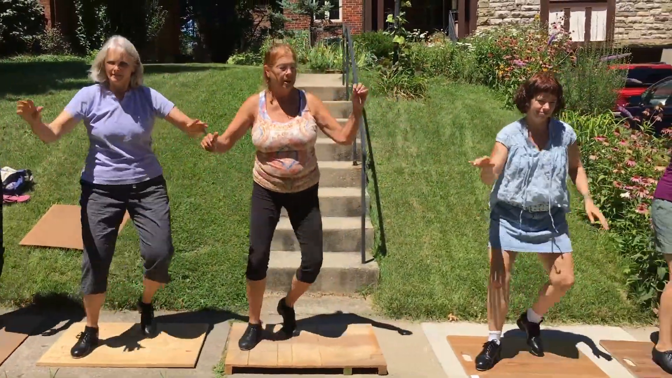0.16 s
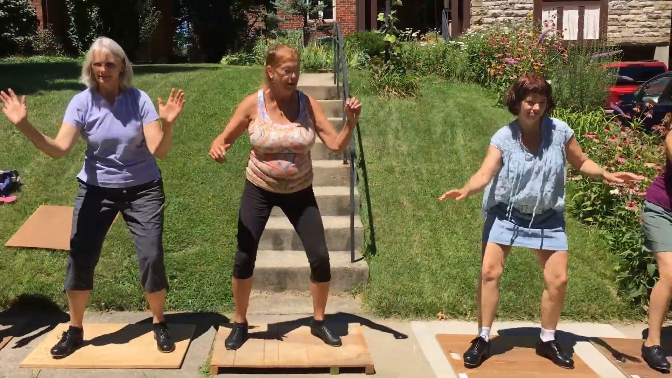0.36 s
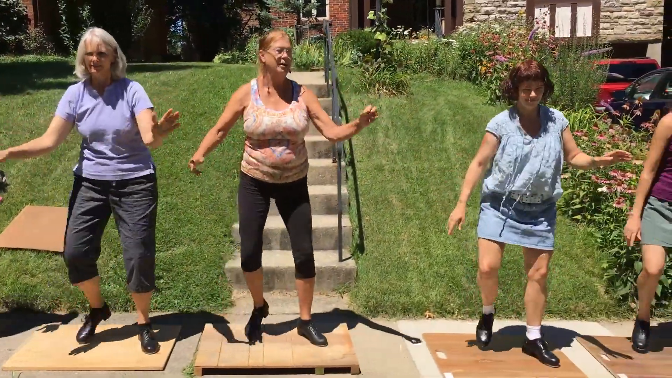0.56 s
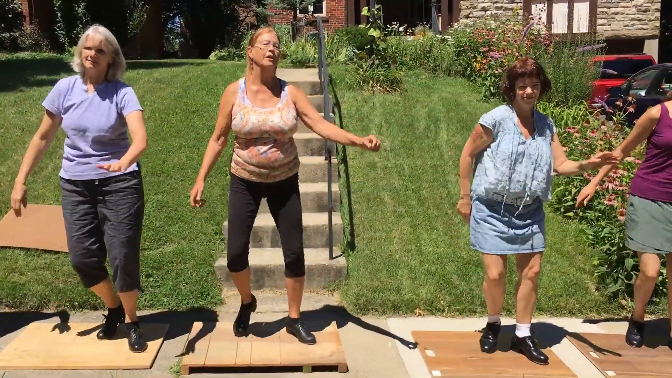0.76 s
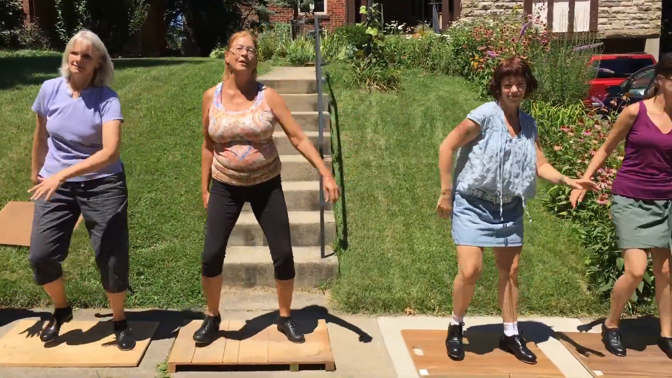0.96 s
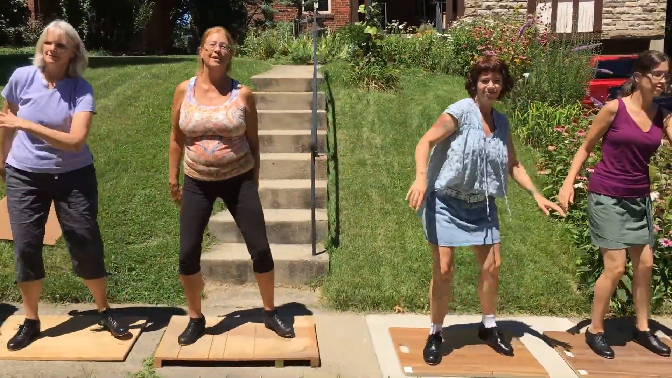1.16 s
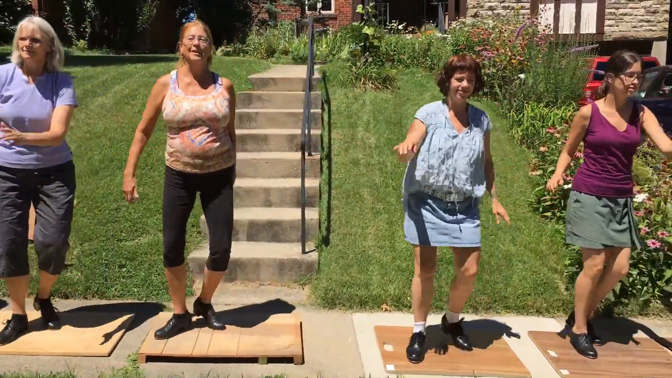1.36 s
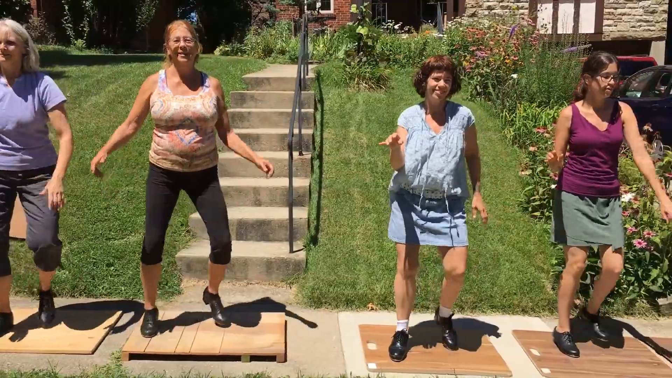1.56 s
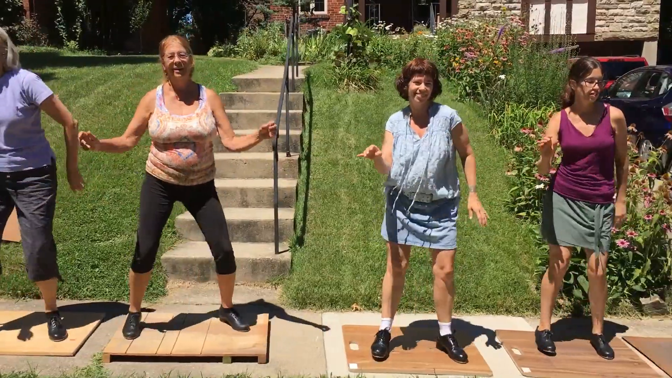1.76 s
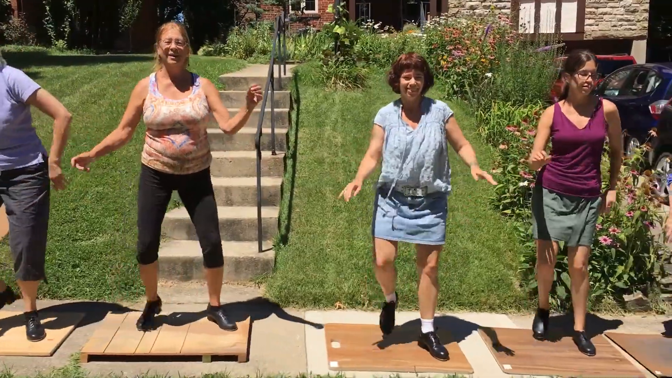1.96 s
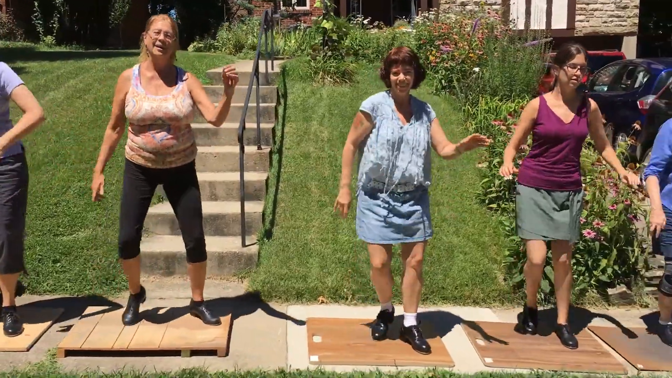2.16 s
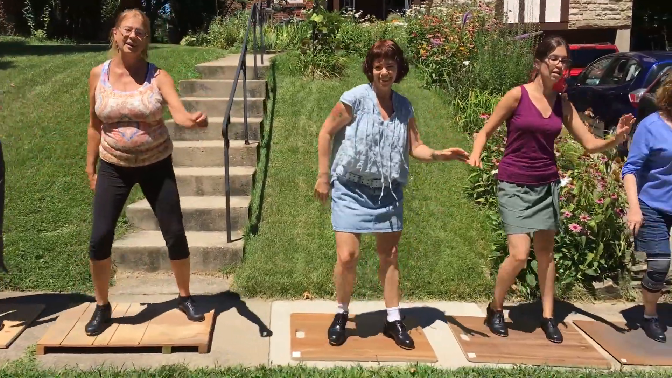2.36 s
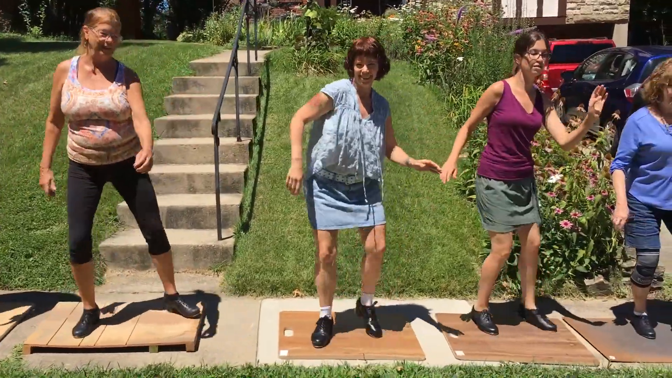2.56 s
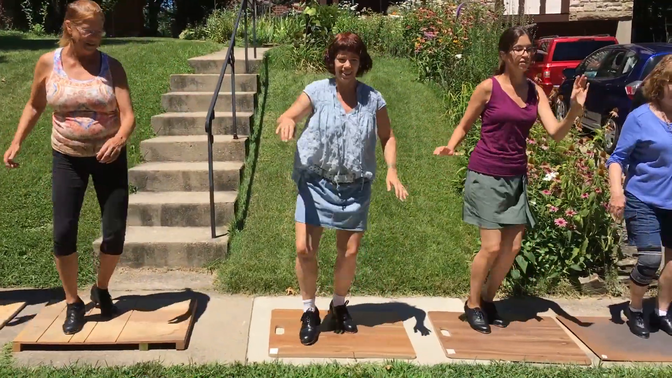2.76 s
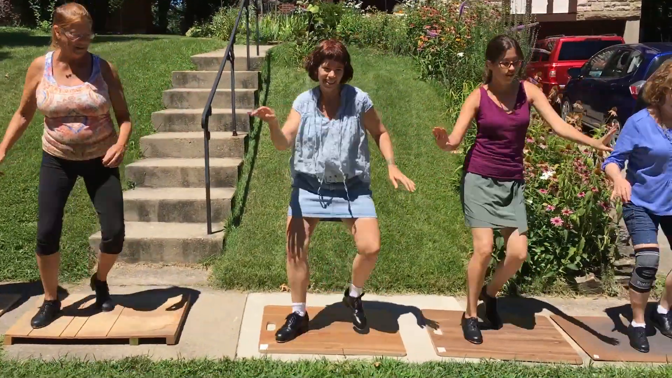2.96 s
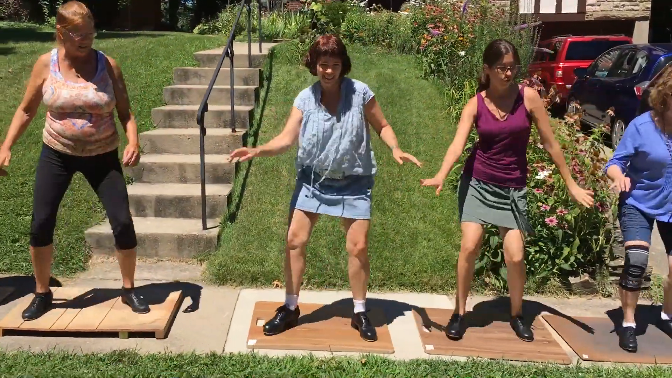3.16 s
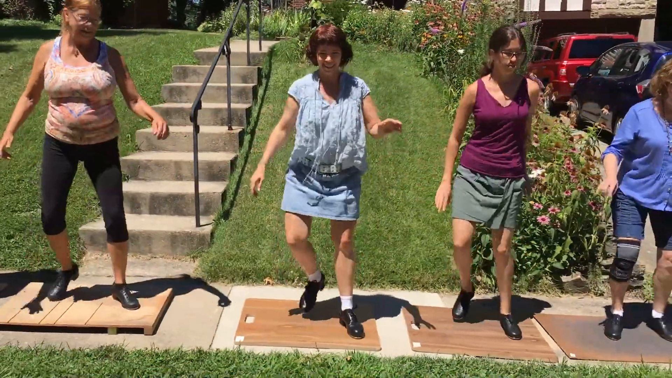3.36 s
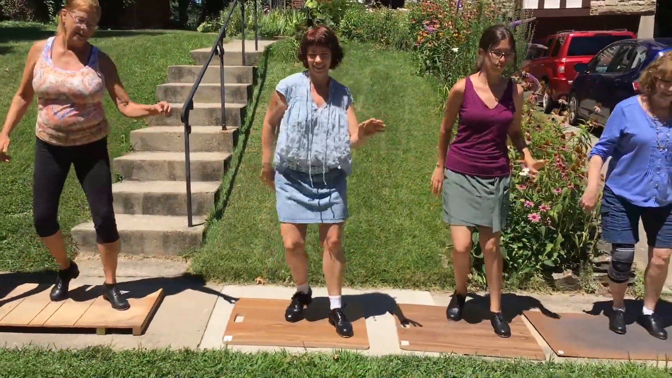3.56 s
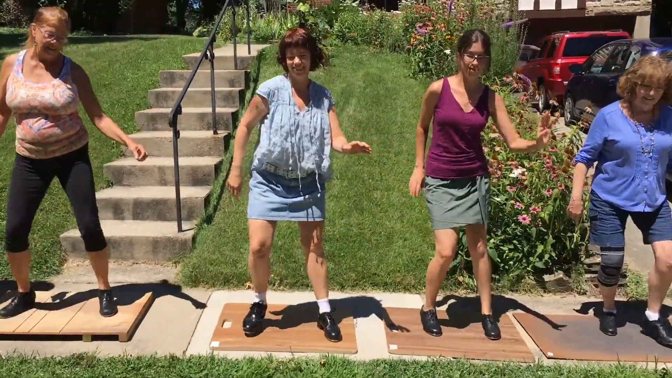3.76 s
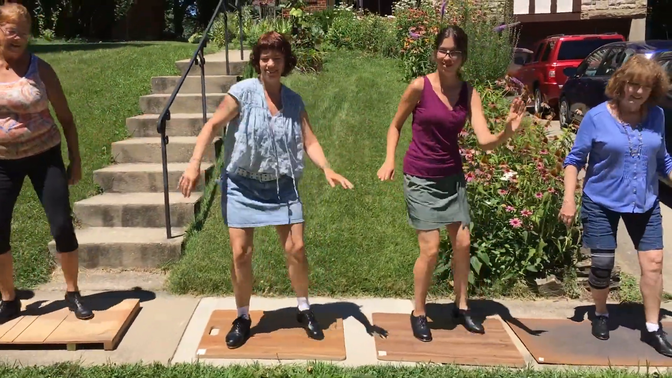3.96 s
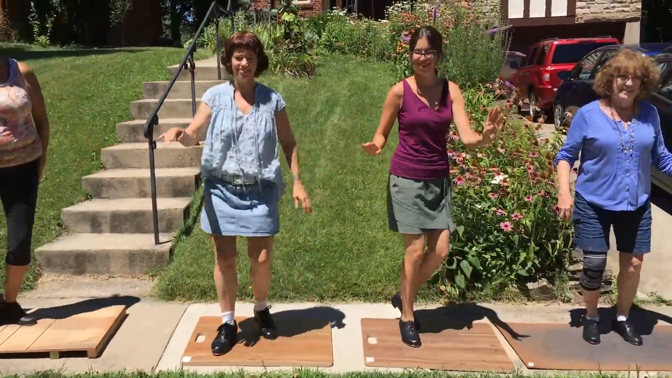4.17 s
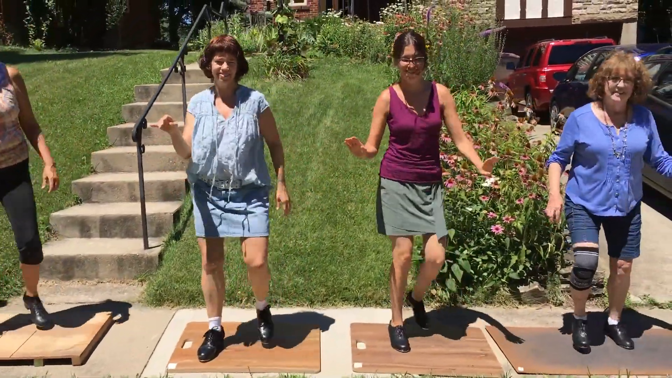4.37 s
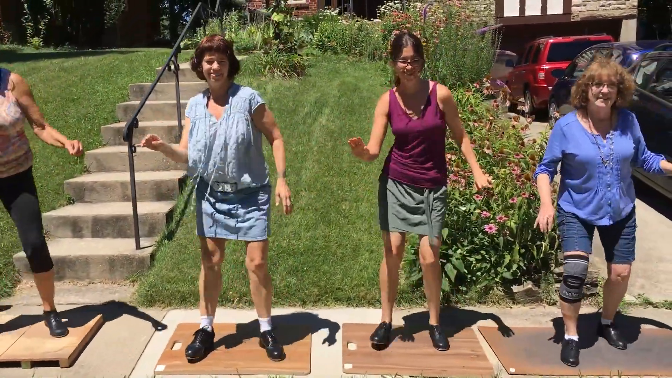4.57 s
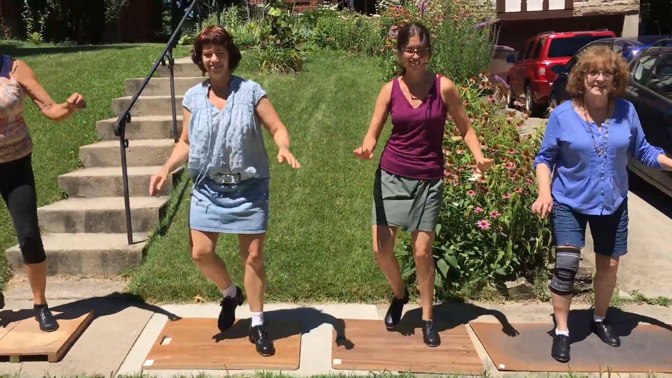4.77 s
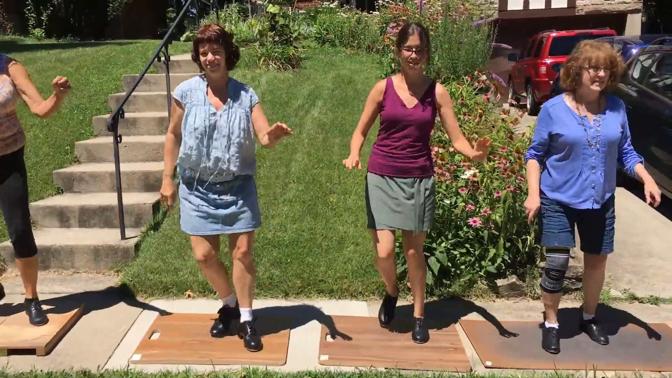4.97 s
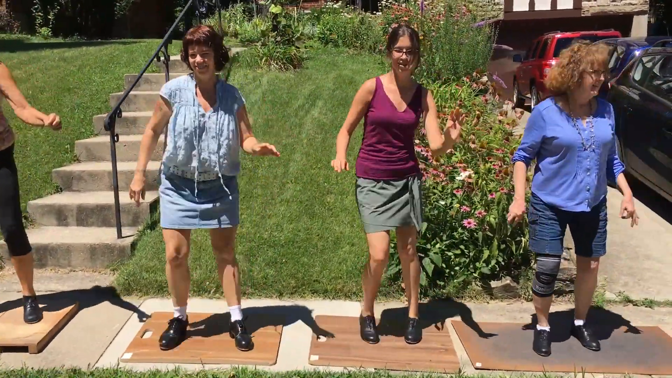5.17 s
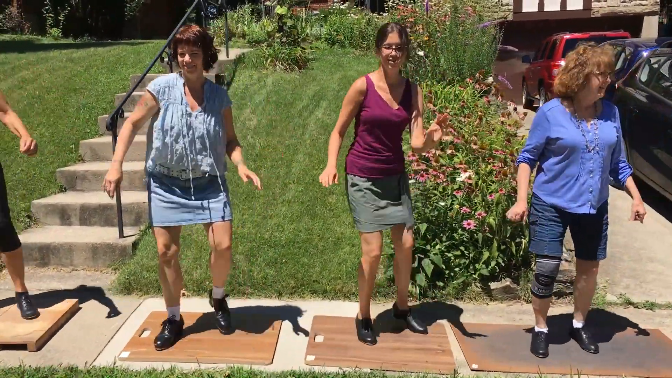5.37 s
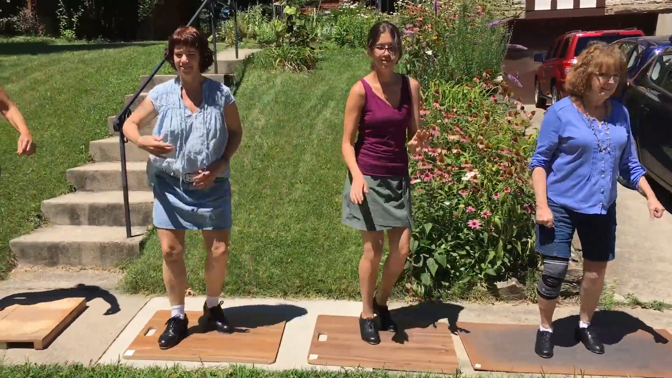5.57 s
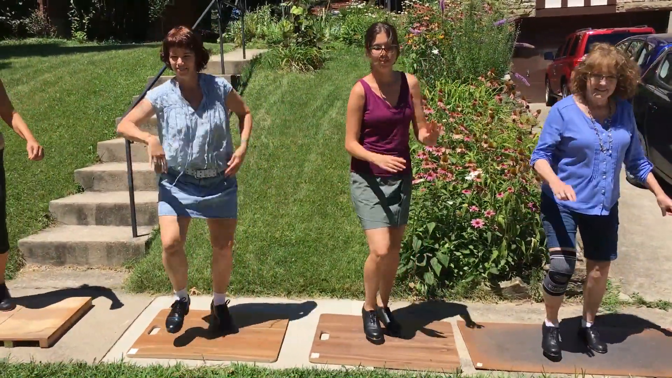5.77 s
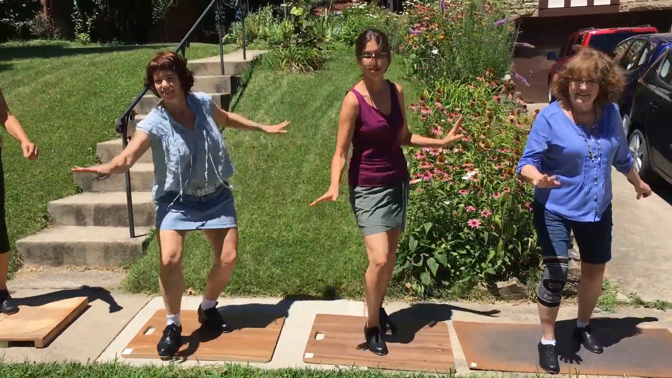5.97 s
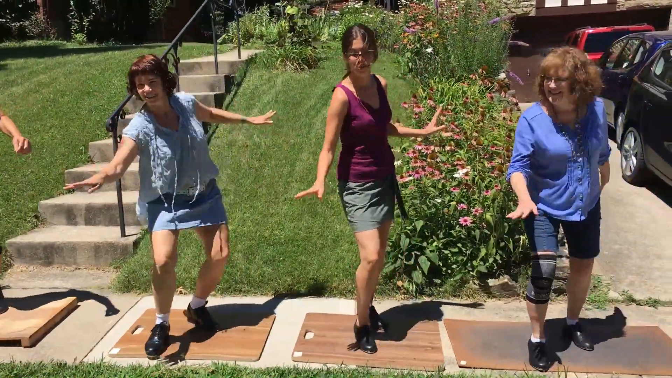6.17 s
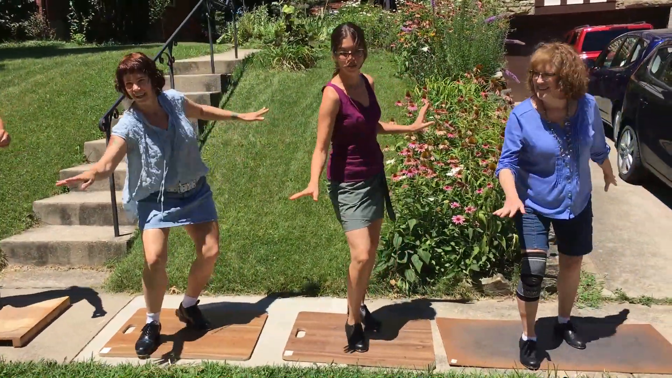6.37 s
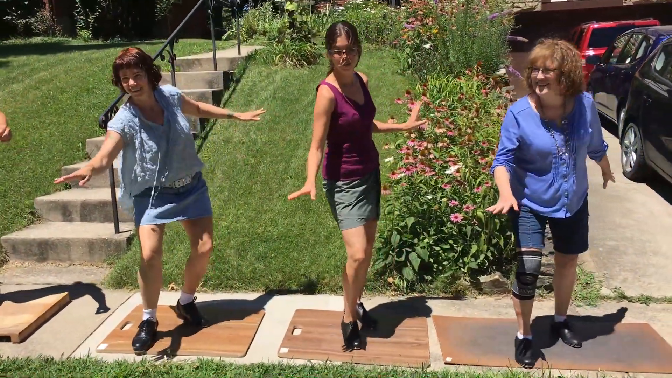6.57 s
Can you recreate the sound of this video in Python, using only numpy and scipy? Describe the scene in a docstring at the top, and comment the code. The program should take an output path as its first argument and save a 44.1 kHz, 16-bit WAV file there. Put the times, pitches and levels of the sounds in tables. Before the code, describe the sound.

Many tap shoes hit plywood boards on a sidewalk, heard in mono from a few metres away. Each blow is a bright, dry metal clack plus a short woody knock, often with a tiny rebound or faint scuff; several dancers land milliseconds apart, making ragged flams. A fast flurry starts at once and peaks around 0.25-0.5 s, then lighter patter. Strong clusters follow near 1.15, 1.5, 1.85 and 2.55 s, with looser steps between. A dense double burst comes at 3.0-3.3 s, then clusters near 3.9, 4.6 and 5.3 s, and a last hard one around 6.05 s before the tapping stops. Hollow low thumps mark landings, especially 0.43 and 5.35 s; a brushing hiss is clearest at 4.85 s. Sparse street echoes scatter behind. Underneath lie quiet town rumble, faint air hiss and a distant engine hum, wavering and slowly climbing.

```python
"""Tap dancers on a pavement

A row of dancers tap on plywood boards, a few metres from a phone. Each blow clacks the loose metal
plate and knocks the board, by noisy contacts that ring damped resonances; landings thump the hollow.
Scuffs and brushes are longer, softer contacts. Steps, cars and house fronts scatter echoes of it all.
Behind are wavering sine harmonics of a distant engine that slowly speeds up, and shaped town noise."""
import sys
import numpy as np
from scipy import signal
from scipy.fft import rfft, irfft
from scipy.io import wavfile
from scipy.ndimage import uniform_filter1d

SR = 44100
rng = np.random.default_rng(int(sys.argv[2]) if len(sys.argv) > 2 else 0)


def master_out(mix):
    """Clip the mix to full scale and print it as 16-bit PCM to the path in sys.argv[1]."""
    frames = np.transpose(np.atleast_2d(mix))
    ceiling = np.clip(frames, -1, 1)
    pcm = np.round(ceiling * 32767).astype(np.int16)
    wavfile.write(sys.argv[1], SR, pcm)


N = 291490  # samples, about 6.6 s

# Heavily damped resonances of the loose metal plate under the shoe.
# Each row: frequency in Hz, width in Hz, relative level in dB.
PLATE_MODES = [(3360, 750, 1), (3923, 666, 8.5), (5780, 1610, 2)]
# The plate's higher resonances, for its sharp edge. Each row: frequency in Hz, width in Hz, relative level in dB.
EDGE_MODES = [(8560, 1400, -6), (11900, 2300, -17.5)]
# Resonances of the plywood board. Each row: frequency in Hz, width in Hz, relative level in dB.
BOARD_MODES = [(722, 550, -1), (1200, 620, -0.4), (1630, 658, 2), (2250, 1340, -0.05)]
# Resonances of the hollow beneath the board; each landing brings its own frequency for the first.
# Each row: frequency in Hz, width in Hz, relative level in dB.
HOLLOW_MODES = [(304.4, 29, 4), (422, 260, -9), (603, 480, -6.5), (174, 80, -20)]


def undb(db):
    """Turn dB into gain."""
    return 10 ** (np.asarray(db) / 20)


def unit(x):
    """Scale to rms 1."""
    return x / np.sqrt(np.mean(x ** 2))


def walk(rate):
    """Wander smoothly and at random, with rms 1, drawing about `rate` new values a second."""
    hold = int(SR / rate)
    steps = np.repeat(rng.standard_normal(N // hold + 1), hold)
    smooth = uniform_filter1d(uniform_filter1d(steps, hold), hold)
    return unit(smooth[:N])


def engine():
    """Second and third harmonics of a climbing firing rate waver together in pitch and swell on their own."""
    # Level of the distant engine's firing lines, before slow swells.
    # Each row: time in seconds, second harmonic in dB, third harmonic in dB.
    engine_levels = [(0.2, -40, -56), (0.95, -48, -41), (1.4, -40, -38), (2.1, -42.5, -39.5),
                     (2.48, -33, -38.5), (2.7, -51, -50.5), (3.87, -38.5, -40), (4.07, -53, -40.5),
                     (4.44, -31.5, -41.5), (4.7, -49, -50.5)]
    start_hz, climb_hz_per_s = 36.25, 2.45
    s, *levels = np.transpose(engine_levels)
    t = np.arange(N) / SR
    firing_hz = (start_hz + climb_hz_per_s * t) * (1 + 0.015 * walk(10))
    turn = 2 * np.pi * np.cumsum(firing_hz) / SR
    out = np.zeros(N)
    for harmonic, db in enumerate(levels, start=2):
        level = undb(np.interp(t, s, db) + 1.2 * walk(3.7))
        out += level * np.sin(harmonic * turn)
    return out


def town():
    """Noise shaped into traffic rumble and air hiss, swelling a little."""
    # Spectrum of the town at a distance. Each row: frequency in Hz, relative level in dB.
    town_spectrum = [(18, -53), (35, -7.5), (103, -9.5), (280, -19), (437, -29.5), (4000, -48), (8980, -57),
                     (16000, -64)]
    level_db = -38
    hz, db = np.transpose(town_spectrum)
    f = np.arange(1, N // 2 + 2) * SR / N
    shape = undb(np.interp(np.log(f), np.log(hz), db))
    noise = irfft(rfft(rng.standard_normal(N)) * shape, N)
    return unit(noise) * undb(level_db + 1.2 * walk(2))


def street(dry):
    """Sparse outdoor reflections thicken at first, then die away at a rate of their own in each band."""
    # Echo from the steps, cars and house fronts, in bands two octaves wide.
    # Each row: band centre in Hz, relative level in dB, time to fall by 60 dB in seconds.
    street_bands = [(348, -8.5, 0.29), (1585, -11.5, 0.45), (4700, -18, 0.58), (10970, -10.5, 0.32),
                    (4050, -26, 1.48)]
    t = np.arange(SR) / SR
    # each place along the row hears the walls differently
    places = 4
    size = (places, len(t))
    # few surfaces, each with its own distinct answer
    sparse = rng.standard_normal(size) * rng.standard_exponential(size) ** 1.65
    # the nearest steps answer after a few milliseconds
    returns = unit(sparse) * (1 - np.exp(-(t / 0.0025) ** 2))
    echo = 0
    for hz, db, t60 in street_bands:
        fade = np.exp(-np.log(1000) * t / t60)
        sos = signal.butter(2, [hz / 2, hz * 2], "bandpass", fs=SR, output="sos")
        band = signal.sosfilt(sos, returns)
        echo = echo + undb(db) * band * fade / np.sqrt(np.sum(fade ** 2))
    # the dance is under way: the opening 1.4 s also stands in for the bar before, which still echoes
    bar = int(1.4 * SR)
    played = np.r_[dry[:bar], dry]
    # each short stretch of the dance comes from a place drawn at random
    stretch = 1024  # samples
    draws = rng.integers(places, size=len(played) // stretch + 1)
    place = np.repeat(draws, stretch)[:len(played)]
    at_place = 1. * (place == np.arange(places)[:, None])
    share = uniform_filter1d(at_place, size=256)
    echoes = signal.fftconvolve(share * played, echo, axes=1).sum(axis=0)
    # moving bodies shade the echo: it comes in patches
    return undb(1.23 * walk(30)) * echoes[bar:bar + N]


def add(out, s, sounds):
    """Lay each sound into out at its time in seconds, cutting late tails at the end."""
    for start, sound in zip((s * SR).astype(int), sounds):
        piece = out[start:start + len(sound)]
        piece += sound[:len(piece)]


def strike(out, s, db, modes, contact_s, settle_s, settle_db, soft_hz, first_hz=None):
    """Each blow is a gritty contact, then a rattle as things settle, heard through the resonances."""
    touch_s = 0.001186  # scale of the random time the sole grazes before the full blow
    size = 4096
    hz, width, mode_db = np.transpose(modes)
    t, f = np.arange(size) / SR, np.arange(size // 2 + 1) * SR / size
    chance = rng.standard_normal((len(s), 2 * len(modes) + size))
    tune, place, grit = np.split(chance, [len(modes), 2 * len(modes)], axis=1)
    graze_s = touch_s * np.minimum(np.abs(grit[:, :1]), 2)
    late = np.maximum(t - graze_s, 0)
    blow = late / contact_s * np.exp(1 - late / contact_s)
    rattle = (1 - np.exp(-t / (contact_s + touch_s))) * np.exp(-late / settle_s)
    # the power makes the grit spikier
    push = grit * np.abs(grit) ** 1.36 * (blow + undb(settle_db) * rattle)
    body = 0
    for k in range(len(modes)):
        # every board and shoe is tuned a little apart and struck elsewhere
        centre = hz[k] + 0.5 * width[k] * np.clip(tune[:, [k]], -2, 2)
        if k == 0 and first_hz is not None:
            centre = first_hz[:, None]
        gain = (-1) ** k * undb(mode_db[k] + 2.6 * place[:, [k]])
        damping = 1j * f * width[k]
        body = body + gain * damping / (centre ** 2 - f ** 2 + damping)
    # a softer contact carries less treble
    clack = irfft(rfft(push) * body / (1 + 1j * f / soft_hz) ** 2, size)
    # db sets the loudest 2 ms of each clack
    loudest = np.sqrt(uniform_filter1d(clack ** 2, size=88).max(axis=1))
    add(out, s, clack * (undb(db) / loudest)[:, None])


def rebounds(s, click_db, knock_db):
    """The shoe bounces: one weaker blow follows each a few milliseconds later."""
    lag_s, level_db, scatter_db = .005, -9.5, 6  # random lag scale, highest level under the blow, spread below
    lag, weak_click, weak_knock = rng.standard_exponential((len(s), 3)).T
    bounce_s = s + .003 + lag_s * np.minimum(lag, 2)
    bounce_click_db = click_db + level_db - scatter_db * weak_click
    bounce_knock_db = knock_db + level_db - scatter_db * weak_knock
    return np.r_[s, bounce_s], np.r_[click_db, bounce_click_db], np.r_[knock_db, bounce_knock_db]


def plate(out, s, click_db):
    """A very short contact clicks the metal plate; its sharp edge rings higher, more so on harder blows."""
    edge_db, edge_scatter_db, edge_gain_per_db = -10.5, 3.5, 0.22
    # edge-on blows are sharp, flat ones dull
    scatter = edge_scatter_db * rng.standard_normal(len(s))
    sharp_db = click_db * (1 + edge_gain_per_db) + edge_db + scatter
    strike(out, s, click_db, PLATE_MODES, 0.0001, 0.0034, -14, soft_hz=6700)
    strike(out, s, sharp_db, EDGE_MODES, 0.00008, 0.0054, -23, soft_hz=13100)


def board(out, s, knock_db):
    """The plywood knocks just after the plate, with a longer and duller contact."""
    lag_s = 0.0004
    strike(out, s + lag_s, knock_db, BOARD_MODES, 0.00032, 0.0087, -7.0, soft_hz=3500)


def hollow(out, s, knock_db):
    """The hollow answers each blow a little, softly and without its first resonance."""
    strike(out, s, knock_db - 14.5, HOLLOW_MODES[1:], 0.003, 0.037, -1.7, soft_hz=1100)


def scuffs(out, s, click_db, knock_db):
    """Soles drag and far dancers lag: a faint, blurred scuff trails every blow."""
    lag_s, level_db, scatter_db = .022, -15, 29.5  # random lag scale, highest level under the blow, spread below
    lag, weak = rng.standard_exponential((len(s), 2)).T
    scuff_s = s + lag_s * np.minimum(lag, 2)
    scuff_db = np.maximum(click_db, knock_db) + level_db - scatter_db * weak
    strike(out, scuff_s, scuff_db, [*BOARD_MODES, *PLATE_MODES], 0.0093, 0.011, -21.0, soft_hz=5150)


def landings(out):
    """Full-weight landings thump the hollow beneath the board through all its resonances."""
    # Landings along the row. Each row: start in seconds, thump level in dB, pitch of the hollow in Hz.
    landing_rows = [(0.25, -16.5, 340), (0.431, -12, 372), (0.457, -20.5, 296), (1.129, -21.5, 264),
                    (1.161, -19, 317), (1.184, -27, 230), (1.842, -19.5, 293), (2.535, -16, 312),
                    (3.041, -20.5, 306), (3.072, -24, 212), (3.187, -15, 286), (3.257, -17.5, 340),
                    (3.897, -16, 324), (3.944, -24, 237), (4.251, -24.5, 278), (4.622, -22.5, 286),
                    (4.938, -21, 300), (5.315, -20, 298), (5.346, -11.5, 300), (5.964, -19, 281),
                    (6.034, -23, 385), (6.172, -26.5, 281)]
    s, thump_db, hollow_hz = np.transpose(landing_rows)
    strike(out, s, thump_db, HOLLOW_MODES, 0.0016, 0.0037, -7, soft_hz=704, first_hz=hollow_hz)


def brushes(out):
    """A sole brushes long over a board: a slow contact hisses through the plate and its edge."""
    # Brushes of a sole. Each row: start in seconds, hiss level in dB.
    brush_rows = [(0.859, -39), (3.281, -45), (4.834, -29.5)]
    s, hiss_db = np.transpose(brush_rows)
    strike(out, s, hiss_db, [*PLATE_MODES, *EDGE_MODES], 0.019, 0.015, 0.91, soft_hz=8940)


def dancers():
    """Plate and board answer every blow and rebound; hollow, scuffs, landings and brushes join them."""
    # Blows of the shoes on the boards. Each row: start in seconds, plate click in dB, board knock in dB.
    tap_rows = [(0.033, -22, -25.5), (0.0573, -16, -16.5), (0.092, -32, -14.5), (0.098, -13, -26.5),
                (0.1112, -18.5, -17), (0.142, -20.5, -21.5), (0.2067, -29, -25), (0.2467, -16, -15),
                (0.2572, -19.5, -13.5), (0.26, -13, -19.5), (0.2675, -14, -24), (0.287, -13, -15),
                (0.291, -15, -28), (0.2983, -14.5, -13.5), (0.301, -12, -12), (0.313, -9, -13.5),
                (0.3276, -20, -22), (0.336, -14, -21), (0.3397, -10, -11), (0.351, -19, -12.5),
                (0.428, -23, -14), (0.4389, -8, -9), (0.4496, -10, -13.5), (0.453, -13, -6.5),
                (0.461, -11.5, -24), (0.471, -25, -35), (0.483, -19, -29), (0.5191, -22, -24),
                (0.53, -26, -23), (0.549, -40, -27), (0.5968, -25, -32), (0.6017, -31, -25),
                (0.6185, -23, -20.5), (0.6443, -22, -24.5), (0.6611, -18, -15.5), (0.6961, -16, -28),
                (0.7128, -42, -20), (0.725, -25, -30), (0.795, -15.5, -15), (0.8079, -17, -13),
                (0.8189, -15, -20), (0.8997, -27.5, -33), (1.0994, -18.5, -24.5), (1.1223, -6, -18.5),
                (1.13, -32, -9.5), (1.1376, -7, -16), (1.1436, -16.5, -10.5), (1.1571, -12, -10.5),
                (1.1659, -19, -17), (1.197, -18.5, -18), (1.231, -22.5, -26.5), (1.2808, -20.5, -25),
                (1.301, -20.5, -22), (1.335, -24.5, -15), (1.35, -24, -26.5), (1.382, -21, -28),
                (1.42, -26, -25), (1.484, -22, -22), (1.491, -15.5, -10), (1.5022, -22.5, -23.5),
                (1.5206, -20, -17.5), (1.595, -18, -22), (1.613, -28, -40), (1.633, -20.5, -26),
                (1.7456, -40, -34.5), (1.8277, -19.5, -16), (1.8357, -17, -9), (1.8435, -10, -8.5),
                (1.851, -11.5, -25.5), (1.8582, -6.5, -15), (1.8923, -11.5, -17), (1.8964, -28, -26),
                (1.914, -14.5, -27), (2.012, -27, -28), (2.0215, -15.5, -20), (2.045, -19.5, -18),
                (2.106, -22, -19.5), (2.1263, -31, -18.5), (2.1627, -17.5, -22.5), (2.2053, -13.5, -11.5),
                (2.229, -25, -26.5), (2.261, -29, -31.5), (2.5013, -11.5, -19), (2.523, -16, -12.5),
                (2.533, -14.5, -12.5), (2.55, -13.5, -10), (2.5647, -11, -12.5), (2.5877, -43, -16.5),
                (2.6353, -27, -25.5), (2.669, -26.5, -19.5), (2.706, -26.5, -30.5), (2.7414, -25, -24.5),
                (2.7539, -23, -20.5), (2.8, -19.5, -27), (2.8198, -26, -28), (2.836, -19, -12),
                (2.865, -23, -28), (2.8845, -15, -18.5), (2.899, -14, -24), (2.92, -24.5, -20),
                (2.9946, -54, -30), (3.0178, -28, -15), (3.033, -9.5, -17.5), (3.039, -14.5, -16.5),
                (3.071, -7, -13.5), (3.077, -9.5, -29), (3.0821, -11, -13.5), (3.0967, -18.5, -14),
                (3.1466, -21, -17), (3.1862, -19, -14.5), (3.1983, -17, -22.5), (3.218, -11, -16),
                (3.2321, -6, -19), (3.244, -9.5, -6.5), (3.25, -23, -12), (3.261, -18.5, -16.5),
                (3.328, -27.5, -29.5), (3.3796, -31, -35), (3.4218, -21, -22), (3.436, -19.5, -19.5),
                (3.4607, -15.5, -15.5), (3.5288, -25, -24), (3.544, -18, -19), (3.5648, -22, -13),
                (3.6028, -14.5, -19.5), (3.6543, -20, -20), (3.681, -25.5, -27.5), (3.8881, -9.5, -12),
                (3.9007, -16, -15), (3.927, -20, -25), (3.9399, -7.5, -14), (3.9525, -9.5, -19),
                (3.9567, -19, -9), (3.981, -23, -26), (4.1049, -37, -21.5), (4.1143, -15.5, -27),
                (4.1361, -23.5, -19.5), (4.1742, -24.5, -25), (4.219, -33, -30), (4.245, -16.5, -13),
                (4.264, -22, -23), (4.291, -28, -15), (4.3043, -17, -15), (4.52, -17, -22),
                (4.588, -28.5, -24), (4.5945, -34, -25), (4.602, -37, -36), (4.6145, -16.5, -12),
                (4.621, -8.5, -17.5), (4.627, -12, -12), (4.637, -11, -14), (4.655, -12, -18.5),
                (4.796, -23, -25), (4.811, -19, -21), (4.8202, -17, -19.5), (4.828, -20, -24.5),
                (4.897, -31, -24.5), (4.938, -22.5, -15), (4.971, -23, -16.5), (4.991, -22, -16),
                (5.001, -24, -27.5), (5.0115, -28.5, -24), (5.0894, -22, -22.5), (5.103, -36.5, -28.5),
                (5.115, -44.5, -34), (5.284, -36, -34), (5.3004, -12, -11), (5.316, -13.5, -11),
                (5.325, -17.5, -28), (5.335, -23, -15), (5.357, -23, -18.5), (5.3668, -18.5, -20),
                (5.394, -31, -29), (5.416, -23, -18), (5.4362, -34, -22.5), (5.476, -25.5, -26),
                (5.5274, -23, -26.5), (5.5457, -23.5, -17), (5.6289, -28, -26.5), (5.6454, -19, -13.5),
                (5.6774, -18.5, -20.5), (5.7035, -12, -15), (5.811, -28, -27), (5.96, -29.5, -17),
                (6.0095, -12, -15), (6.0269, -8.5, -12.5), (6.0348, -17, -8), (6.039, -7, -9),
                (6.0729, -11.5, -17.5), (6.0856, -10, -16.5), (6.167, -35, -26), (6.2937, -60, -28.5)]
    s, click_db, knock_db = np.transpose(tap_rows)
    hit_s, hit_click_db, hit_knock_db = rebounds(s, click_db, knock_db)
    out = np.zeros(N)
    plate(out, hit_s, hit_click_db)
    board(out, hit_s, hit_knock_db)
    hollow(out, s, knock_db)
    scuffs(out, s, click_db, knock_db)
    landings(out)
    brushes(out)
    return out


def scene():
    """Sum the dancers, their echo and the background into one channel."""
    taps = dancers()
    return (taps + street(taps) + engine() + town())[None]


def record(dry):
    """The phone rounds the loudest peaks, drops the deepest bass and cuts the top."""
    bass_hz, top_hz = 42, 16000
    rounded = np.tanh(0.78 * dry) / 1.114
    thin = signal.sosfilt(signal.butter(3, bass_hz, "highpass", fs=SR, output="sos"), rounded)
    return signal.sosfilt(signal.ellip(8, .2, 70, top_hz, fs=SR, output="sos"), thin)


dry = scene()
out = record(dry)
master_out(out)
```